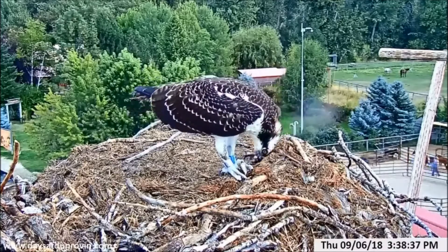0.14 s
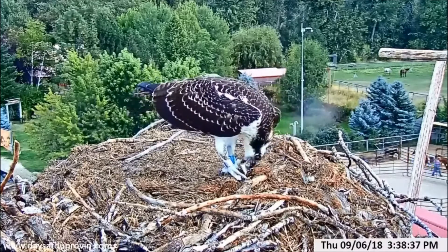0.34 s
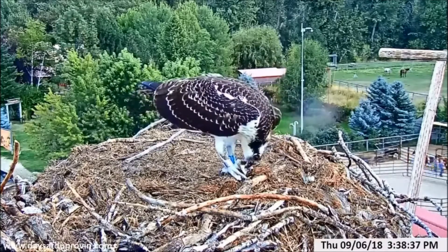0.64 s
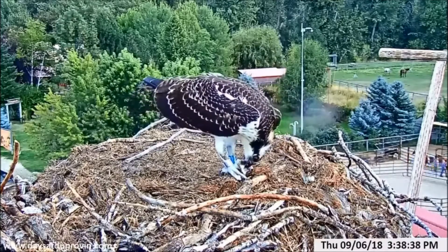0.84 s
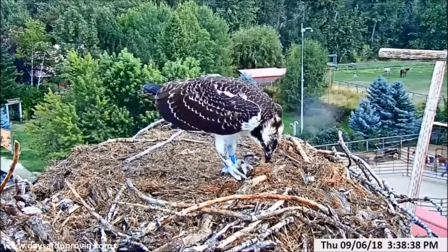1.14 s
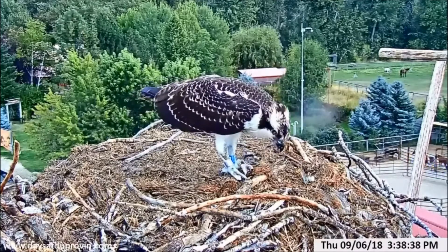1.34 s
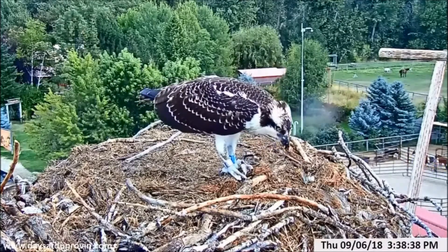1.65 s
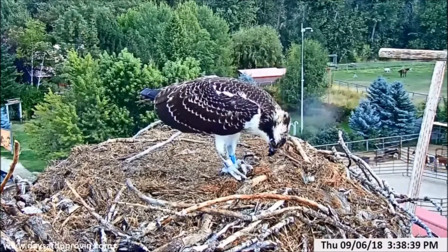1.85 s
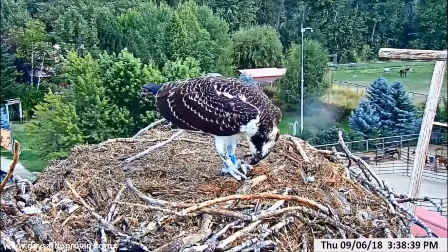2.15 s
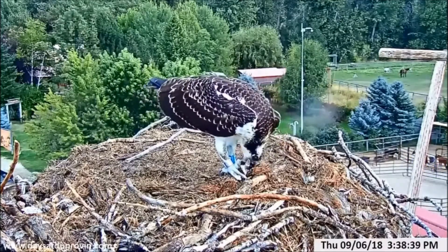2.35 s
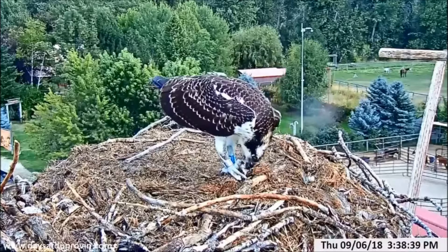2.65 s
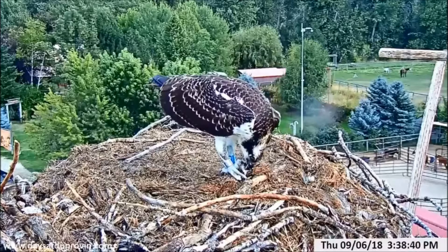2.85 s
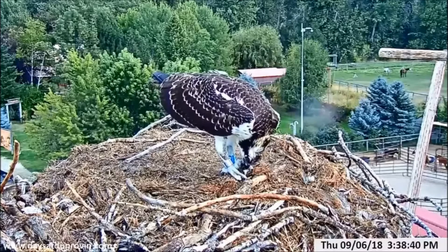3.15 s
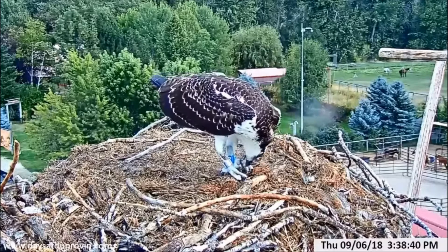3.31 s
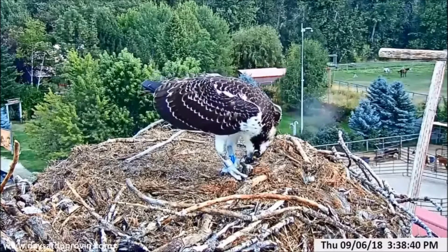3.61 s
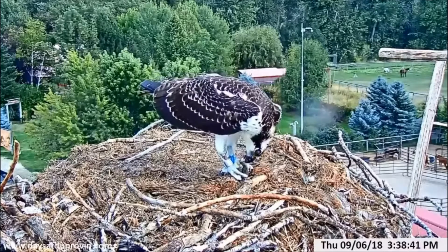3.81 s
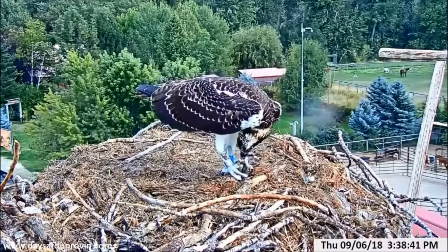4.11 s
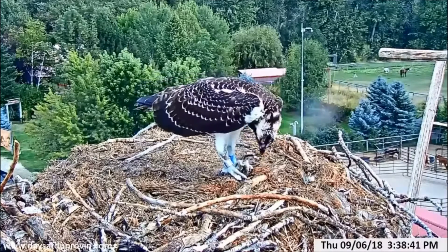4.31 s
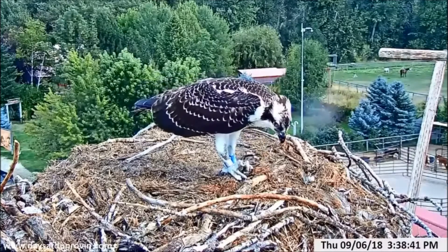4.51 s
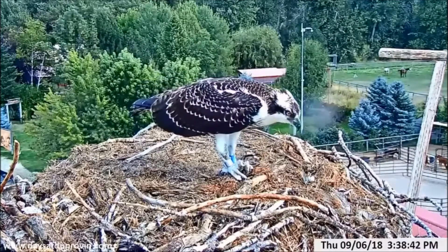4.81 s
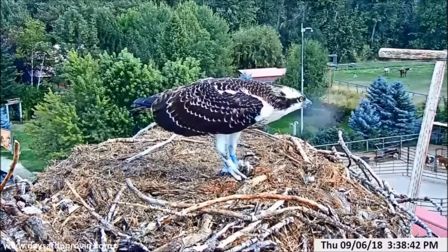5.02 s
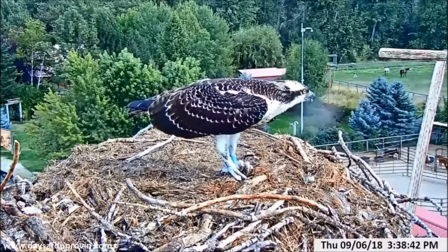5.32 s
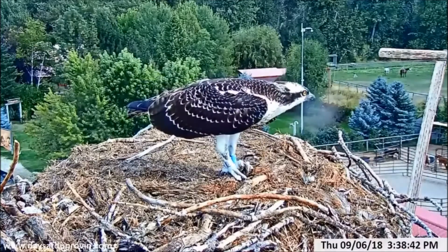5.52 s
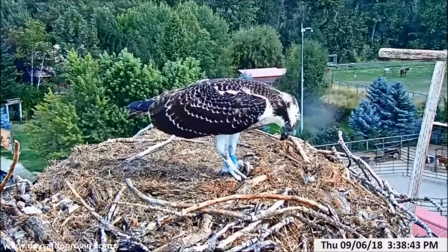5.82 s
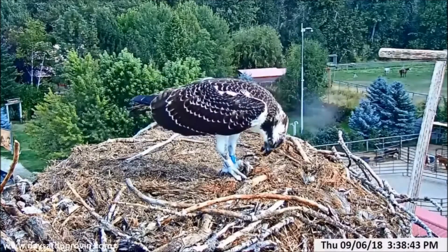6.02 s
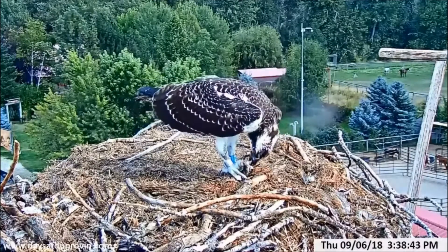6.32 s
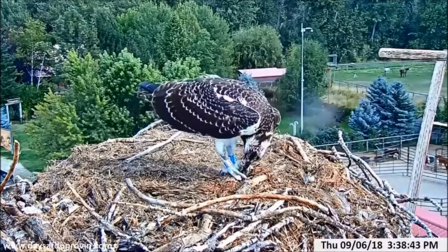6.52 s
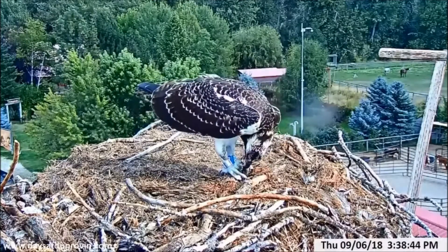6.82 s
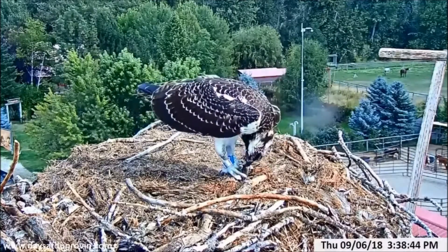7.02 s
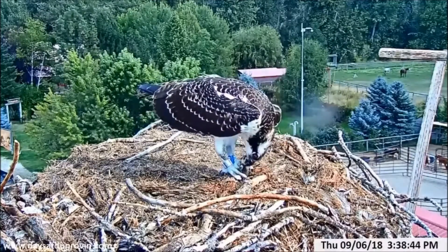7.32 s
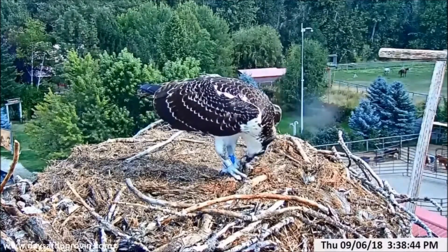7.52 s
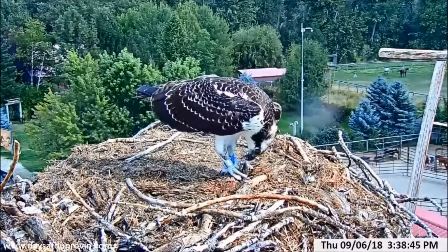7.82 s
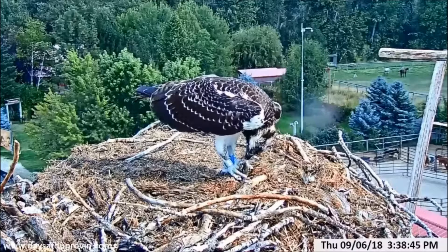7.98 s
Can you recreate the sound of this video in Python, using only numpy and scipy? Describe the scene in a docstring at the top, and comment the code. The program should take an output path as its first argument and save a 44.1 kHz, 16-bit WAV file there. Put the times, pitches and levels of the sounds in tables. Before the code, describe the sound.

An osprey calls very close to a mono nest microphone in quiet countryside. At 0 seconds a rough, reedy chirp is already sounding, followed by another at 0.2, a softer whistle at 0.4 and barely audible peeps until 0.9. Quiet air, faint soft puffs and a weak beak tick fill the gap. From 2.3 to 4.3 seconds comes a brisk run of ten shrill chirps, about five a second, each scooping up and then sagging, some raspy, one briefly cracking into a squeal near 3.4. Quiet returns, with subtle low hum coming and going. From 5.8 to 7.7 the last burst is the loudest: eight piercing notes, several longer, leaping from a low reedy start to a harsh whistle, with crisp beak ticks and small low thumps. The final note is rougher and cracks near its end. Faint, dull woodland echoes fade into quiet air by 8 seconds.

```python
"""Osprey chirping on its nest

An osprey gives three bursts of shrill chirps close to a mono nest microphone.
Harmonics of a gliding pitch break between a low, reedy register and a high, raspy whistle.
Filtered noise adds the rasp and the ticks of the beak; low thumps mark the loud upward leaps.
Decaying noise makes faint echoes, over a quiet rural background of coloured noise and hum."""
import sys
import numpy as np
from scipy import signal
from scipy.fft import rfft, irfft, next_fast_len
from scipy.io import wavfile
from scipy.ndimage import uniform_filter1d, minimum_filter1d

SR = 44100
rng = np.random.default_rng(int(sys.argv[2]) if len(sys.argv) > 2 else 0)


def store_pcm(level_fs):
    """Save levels as 16-bit WAV."""
    pcm = np.round(np.clip(level_fs, -1, 1) * 32767).astype(np.int16)
    wavfile.write(sys.argv[1], SR, np.atleast_2d(pcm).T)


N = 359415
TOP_HZ = 11900  # nothing sounds above this
BRIGHT_DB = -24  # chirps softer than this lose their treble; louder leaps thump


def amp(db):
    """Decibels to gain."""
    return 10 ** (np.asarray(db) / 20)


def unit(x):
    """Scale to rms 1."""
    return x / np.sqrt(np.mean(x ** 2) + 1e-20)


def along(points, hz):
    """Read (Hz, value) points on a log frequency axis."""
    point_hz, values = np.transpose(points)
    return np.interp(np.log(hz + 1), np.log(point_hz + 1), values)


def curve(rows):
    """One value per sample from (s, value) rows."""
    return np.interp(np.arange(N) / SR, *np.transpose(rows))


def filtered(x, response):
    """Shape x by a gain that is a function of frequency in Hz."""
    size = next_fast_len(len(x) + 8192)
    hz = np.fft.rfftfreq(size, 1 / SR)
    return irfft(rfft(x, size) * response(hz), size)[:len(x)]


def noise(spectrum):
    """Noise of rms 1 with a (Hz, dB) colour."""
    return unit(filtered(rng.standard_normal(N), lambda hz: amp(along(spectrum, hz))))


def band(centre_hz, width_hz):
    """Noise of rms 1 in one bell-shaped band."""
    def bell(hz):
        return np.exp(-.5 * ((hz - centre_hz) / width_hz) ** 2)
    return unit(filtered(rng.standard_normal(N), bell))


def gate(t, start, end, edge):
    """1 between start and end, with soft edges of the given length."""
    inside = np.clip(np.minimum(t - start, end - t) / edge + .5, 0, 1)
    return np.sin(np.pi / 2 * inside) ** 2


# Colour of the quiet outdoor air: (frequency_hz, relative level_db per Hz)
AIR_COLOUR = [(30, -42), (70, -22), (115, 0), (220, 4.5), (330, -2), (500, -14), (850, 0), (1300, -1),
              (2100, -8.5), (2750, -6), (3400, -14), (5000, -22.5), (11000, -25.5)]
# A low hum that comes and goes: (time_s, level_db)
HUM_LEVEL = [(2, -86), (3, -66.5), (3.8, -67), (4.6, -89.5), (5.9, -79.5), (6.45, -53.5), (7, -79)]
# Soft puffs of noise between the bursts: (centre_s, length_s, level_db)
PUFF_TIMES = [(1.578, 0.038, -62), (1.896, 0.028, -68), (4.677, 0.04, -63.5), (4.988, 0.031, -68.5)]
# Hollow colour of the puffs: (frequency_hz, relative level_db per Hz)
PUFF_COLOUR = [(600, -41), (870, 15), (1030, -24), (1300, 8), (1700, -4), (2150, 7.5), (6000, -55)]


def background(air_db=-66.5):
    """Coloured noise for the air, a tone in a noise band for the hum, swells of noise for the puffs."""
    t = np.arange(N) / SR
    air = amp(air_db + .5 * band(0, 4)) * noise(AIR_COLOUR)  # the level wavers slowly
    hum = amp(curve(HUM_LEVEL)) * unit(np.sin(2 * np.pi * 177 * t) + .5 * band(260, 23))
    swell = np.zeros(N)
    for centre, length, level_db in PUFF_TIMES:
        swell += amp(level_db) * np.exp(-.5 * ((t - centre) / length) ** 2)
    return air + hum + swell * noise(PUFF_COLOUR)


def leaps(length, lead):
    """A short reedy lead-in, of more than 20 ms, leaps up into the whistle."""
    return .02 < lead < length / 2


def effort(t, start, end, lead, pitch_hz, glide, scoop, level_db, swell_db, soft_db):
    """One push of breath: whistle pitch and level rise, drift and sag together."""
    length = end - start
    since = np.clip(t - start, 0, length)
    left = np.clip(end - t, 0, length)
    drift = since / length - .5
    # the pitch scoops up from below, timed by the lead-in on the way to a leap
    climb_s = 1.28 * lead if leaps(length, lead) else .07
    dip = scoop * np.clip(1 - since / climb_s, 0, 1) ** 2
    droop = .19 * np.exp(-left / .0136)  # share of the pitch lost as the push ends
    soft_onset_db = soft_db * np.exp(-since / .011)
    release_db = 19 * np.exp(-left / .011)
    pitch = pitch_hz * (1 + glide * drift) * (1 - dip - droop)
    return pitch, level_db + swell_db * drift - (soft_onset_db + release_db)


REEDY_RATIO, SQUEAL_RATIO = .743, 1.425  # pitch over the whistle's pitch
# Registers of the syrinx, each one row:
# (pitch_ratio to the whistle, level_db re the chirp, rasp_db re the chirp's rasp,
#  treble_db re level before the voice's dulling, pitch_jitter as a share)
WHISTLE = (1, -0.15, 1, -13, .0015)
REEDY = (REEDY_RATIO, 0.41, -5.5, -13, .002)
SQUEAL = (SQUEAL_RATIO, -1.16, 1.3333, -9.5, .018)
# The whistle cracks into a rough squeal: (start_s, end_s)
SQUEAL_TIMES = [(3.386, 3.428), (7.612, 7.644)]


def registers(start, end, lead, tail, shortest_s=.006):
    """Split a chirp at its register breaks: reedy lead-in, whistle with any squeal, reedy tail."""
    if lead > (end - start) / 2:
        return [(start, end, REEDY)]
    leap = start + lead * (lead > shortest_s)
    drop = end - tail * (tail > shortest_s)
    cuts, kinds = [start, leap], [REEDY, WHISTLE]
    for begin, stop in SQUEAL_TIMES:
        if leap < begin < drop:
            cuts += [begin, stop]
            kinds += [SQUEAL, WHISTLE]
    cuts += [drop, end]
    kinds += [REEDY]
    return [(a, b, kind) for a, b, kind in zip(cuts, cuts[1:], kinds) if b > a]


# Throat and open beak as they shape the overtones: (frequency_hz, gain_db)
THROAT = [(700, -13), (1450, -3.5), (1800, -2.5), (2050, -5), (2700, -3.5), (3100, 2.5), (3600, 1.5),
          (3900, -9.5), (4200, -17.5), (4800, -25), (5350, -36), (6300, -49), (7200, -17), (8300, -13),
          (10800, -16), (11600, -35.5)]


def overtones(phase, shake, pitch, level_db, treble_db, mellow=0.82, count=7):
    """Harmonics weighted by the throat; soft notes lose their overtones, and the highest ones shake."""
    order = np.arange(1, count + 1)[:, None]
    hz = order * pitch
    soft_cut_db = mellow * np.clip(level_db + 34.5, -16, 0)
    gain = amp(along(THROAT, hz) + (order > 1) * soft_cut_db) * (hz < TOP_HZ)
    high = hz > 6300  # above the throat's notch
    body, treble = gain * ~high, gain * high
    body = body / np.linalg.norm(body, axis=0)
    treble = treble / np.sqrt(np.mean(np.sum(treble ** 2, axis=0)) + 1e-12) * amp(treble_db)
    steady = body * np.sin(order * phase)
    shaking = treble * np.sin(order * (phase + shake))
    return np.sqrt(2) * np.sum(steady + shaking, axis=0)


def outlet(hz):
    """The small beak radiates lows poorly and the throat swallows a band above the second overtone."""
    return hz / np.hypot(hz, 1100) * (1 - .95 * np.exp(-((hz - 5600) / 1400) ** 4))


# The chirps, one per row; a lead-in of full length never whistles:
# (start_s, end_s, reedy_lead_s, reedy_tail_s, whistle pitch_hz, glide as a share of the pitch,
#  scoop from below as a share of the pitch, level_db, swell_db over the chirp,
#  onset_softness_db, rasp_db re level)
CHIRPS = [(0.0, 0.12, 0.0, 0.1, 2573.0, -0.03, 0.22, -17.8, 1.0, 8.0, -9.0),
          (0.207, 0.288, 0.081, 0.0, 2549.0, -0.19, 0.21, -16.0, 2.0, 3.0, -14.0),
          (0.431, 0.546, 0.035, 0.009, 2450.0, -0.17, 0.17, -26.0, -11.0, 26.0, -22.0),
          (0.748, 0.79, 0.042, 0.0, 2316.0, -0.0, 0.07, -48.0, -0.4, 5.0, -8.0),
          (0.79, 0.908, 0.0, 0.076, 2200.0, -0.06, -0.2, -59.0, 12.0, 4.0, -12.0),
          (2.26, 2.403, 0.0, 0.046, 2543.0, -0.13, 0.08, -21.0, 1.0, 22.0, -20.0),
          (2.484, 2.542, 0.0, 0.031, 2416.0, -0.07, 0.04, -23.0, 10.4, 8.0, -17.0),
          (2.646, 2.779, 0.049, 0.016, 2710.0, -0.21, 0.23, -17.1, 2.6, 4.0, -16.0),
          (2.884, 3.005, 0.0, 0.014, 2706.0, -0.15, 0.22, -18.9, 6.6, 5.0, -16.0),
          (3.143, 3.245, 0.0, 0.0, 2629.0, -0.13, 0.19, -22.4, 1.2, 6.0, -13.5),
          (3.337, 3.449, 0.0, 0.0, 2593.0, -0.1, 0.16, -22.7, -1.5, 4.0, -12.0),
          (3.547, 3.651, 0.0, 0.0, 2745.0, -0.11, 0.16, -17.8, 4.9, 6.0, -15.0),
          (3.771, 3.868, 0.0, 0.0, 2740.0, -0.14, 0.18, -19.7, 1.9, 4.0, -15.0),
          (3.971, 4.076, 0.0, 0.0, 2578.0, -0.03, 0.12, -22.0, 1.8, 4.0, -9.0),
          (4.178, 4.262, 0.0, 0.0, 2502.0, -0.04, 0.07, -22.9, 3.3, 4.0, -11.0),
          (5.758, 5.871, 0.0, 0.023, 2744.0, -0.12, 0.23, -16.4, -0.6, 4.0, -18.0),
          (5.931, 6.02, 0.089, 0.0, 2936.0, -0.27, 0.3, -14.9, 1.0, 3.0, -19.0),
          (6.08, 6.264, 0.026, 0.017, 2734.0, -0.04, 0.17, -16.5, -2.8, 4.0, -18.0),
          (6.358, 6.463, 0.037, 0.016, 2691.0, -0.13, 0.17, -17.0, 2.4, 2.0, -17.0),
          (6.57, 6.673, 0.041, 0.014, 2562.0, -0.14, 0.15, -17.6, -3.1, 3.0, -16.0),
          (6.773, 6.975, 0.029, 0.017, 2655.0, -0.09, 0.15, -16.6, -2.3, 4.0, -15.0),
          (7.109, 7.303, 0.027, 0.0, 2695.0, -0.11, 0.18, -16.5, -2.7, 4.0, -15.0),
          (7.452, 7.67, 0.0, 0.0, 2515.0, 0.02, 0.05, -22.2, 1.7, 4.0, -13.0)]
# The membranes repeat only every few cycles: (start_s, end_s, period_cycles, relative depth_db)
DOUBLING = [(0.025, 0.105, 2, -12.5), (0.229, 0.254, 2, -16), (3.975, 4.078, 2, -16.5),
            (4.187, 4.254, 2, -18.5), (6.851, 6.945, 4, -25.5), (7.132, 7.265, 4, -23.5),
            (7.476, 7.599, 2, -22), (7.612, 7.642, 3, -29)]
# Turbulent air in the open throat: (frequency_hz, relative level_db per Hz)
RASP_COLOUR = [(30, -38.5), (70, -32.5), (140, -3.5), (400, -14.5), (800, -4), (1450, -10), (1850, -1),
               (2500, -6.5), (3300, -3.5), (4000, -9.5), (5200, -15), (6500, -24), (8400, -3), (9400, -8.5),
               (10800, -19), (11800, -31.5)]


def osprey(edge=0.0056, shiver_db=-2, stagger_db=-11, hiss_db=-4.0, lurch=.35, bite=0.59, calm=0.0022):
    """The syrinx glides through each chirp and restarts at each break of register."""
    voice, time = np.zeros(N), np.arange(N) / SR
    drift, hiss = band(0, 150), noise(RASP_COLOUR)
    # the membranes flutter near a quarter and a half of the pitch: fuzzy sidebands flank every harmonic
    quarter, half, stagger = band(0, 120), band(0, 46), band(600, 170)
    fits_db = 3.3 * band(0, 45)  # rasp and treble come in short fits
    for onset, finish, lead, tail, *gesture, rasp_db in CHIRPS:
        for start, end, register in registers(onset, finish, lead, tail):
            ratio, gain_db, rough_db, treble_db, jitter = register
            span = np.flatnonzero((time > start - edge) & (time < end + edge))
            t = time[span]
            whistle_hz, level_db = effort(t, onset, finish, lead, *gesture)
            pitch = ratio * whistle_hz * (1 + jitter * drift[span])
            level_db = level_db + gain_db
            if abs(end - start - tail) < 1 / SR:
                level_db = level_db + 2.5  # the reedy tail pops out louder
            phase = 2 * np.pi * np.cumsum(pitch) / SR

            # treble and rasp need full pressure: they fade before the note does
            last_gasp_db = 12 * np.exp(-(end - t).clip(0) / calm)
            slack_db = bite * (level_db - level_db.max()) + fits_db[span] - last_gasp_db
            dull_db = np.clip(5 * (level_db - BRIGHT_DB), -42, 0)
            # the voice frays from the start of a chirp to its end
            fray_db = 3.5 * ((t - onset) / (finish - onset) - .5)
            rasp = amp(rasp_db + rough_db + slack_db / 3 + fray_db)

            # unequal cycles put lines between the harmonics
            uneven = np.zeros(len(t))
            for begin, stop, cycles, depth_db in DOUBLING:
                uneven += amp(depth_db) * gate(t, begin, stop, 0.006) * np.cos(phase / round(cycles))
            shiver = 1.36 * quarter[span] * np.cos(phase / 4) + .7 * half[span] * np.cos(phase / 2)
            shake = lurch * uneven + amp(stagger_db) * rasp * stagger[span]

            tone = overtones(phase, shake, pitch, level_db, treble_db + slack_db + dull_db - 4.5)
            flutter = 2.2 * uneven + amp(shiver_db) * rasp * shiver
            sidebands = filtered(tone * flutter, outlet)
            breath = amp(hiss_db + dull_db / 6) * rasp * hiss[span]
            envelope = amp(level_db) * gate(t, start + 0.00065, end - .0005, edge)
            voice[span] += (tone + sidebands + breath) * envelope
    return voice


# Echoes from clumps of trees: (delay_s, level_db)
ECHOES = [(0.047, -35.5), (0.124, -31), (0.161, -39)]
# How long the woods ring: (frequency_hz, t60_s)
WOODS = [(200, .5), (2500, 1), (5000, 0.72), (10000, 0.23)]


def surroundings(x, tail_db=-37, dull_hz=4600, scatter=0.022):
    """Clumps of trees return smeared echoes over a dull, dying tail."""
    hz, t, grains = signal.stft(rng.standard_normal(SR), SR, nperseg=256)
    decay = amp(-60 * t / along(WOODS, hz)[:, None])
    tail = signal.istft(grains * decay, SR, nperseg=256)[1][:SR]
    answer = amp(tail_db) * tail / np.linalg.norm(tail)
    for delay, level_db in ECHOES:
        smear = np.exp(-.5 * ((np.arange(SR) / SR - delay) / scatter) ** 2)
        clump = rng.standard_normal(SR) * smear
        answer = answer + amp(level_db) * clump / np.linalg.norm(clump)
    dulled = filtered(x, lambda hz: 1 / (1 + (hz / dull_hz) ** 4))
    return signal.fftconvolve(dulled, answer)[:N]


def blows(events, attack, t60):
    """A quick rise and a decay at each (s, dB) event."""
    envelope = np.zeros(N)
    for start, level_db in events:
        t = np.maximum(np.arange(N) / SR - start, 0)
        decay_db = 60 * np.minimum(t / t60, 10)
        envelope += amp(level_db - decay_db) * (1 - np.exp(-t / attack))
    return envelope


# Beak ticks, most of them as it opens for a chirp: (start_s, level_db)
TICKS = [(.77, -37.5), (1.743, -56), (2.877, -24.5), (3.326, -29.5), (3.535, -30.5), (3.76, -29.5),
         (5.922, -26.5), (6.073, -18), (6.347, -22.5), (6.56, -19.5), (6.766, -18), (7.102, -22.5)]


def beak():
    """Ticks ring the throat's two main resonances; loud upward leaps push out a low thump."""
    thumps = []
    for start, end, lead, _, _, _, _, level_db, *_ in CHIRPS:
        if leaps(end - start, lead) and level_db > BRIGHT_DB:
            thumps.append((start + lead, level_db - 13))
    ring = unit(band(1735, 150) + band(3300, 600))
    ticks = blows(TICKS, attack=0.001, t60=0.024) * ring
    return ticks + blows(thumps, attack=.003, t60=0.059) * band(188, 65)


def scene():
    """The bird, its echoes and the background, alike in both channels."""
    bird = osprey() + beak()
    mono = bird + surroundings(bird) + background()
    return np.array([mono, mono])


def limited(x, ceiling=0.32, reach_s=.0012):
    """A fast limiter turns down around the loudest peaks."""
    size = max(int(reach_s * SR), 2)
    needed = np.minimum(1, ceiling / (np.abs(x) + 1e-9))
    return x * uniform_filter1d(minimum_filter1d(needed, 2 * size), size)


def record(dry, low_hz=80):
    """The nest microphone limits the loudest peaks, thins the deep bass and passes nothing above TOP_HZ."""
    def response(hz):
        bass = 0.23 + 0.78 * hz ** 4 / (hz ** 4 + low_hz ** 4)
        return bass * np.clip((TOP_HZ - hz) / 300, 0, 1)
    return np.array([filtered(limited(channel), response) for channel in dry])


dry = scene()
out = record(dry)
store_pcm(out)
```